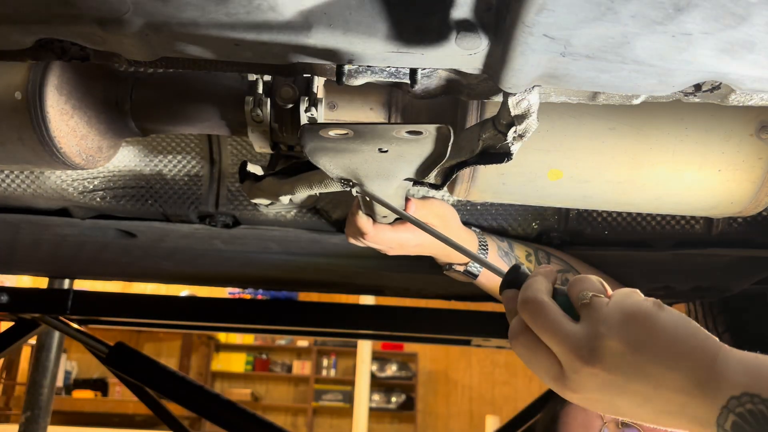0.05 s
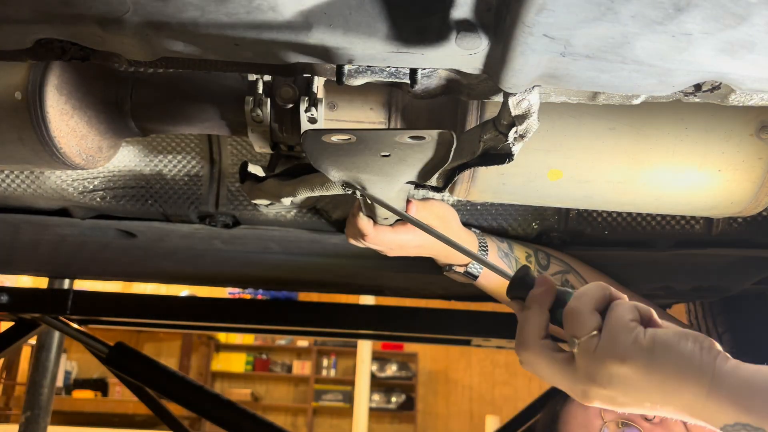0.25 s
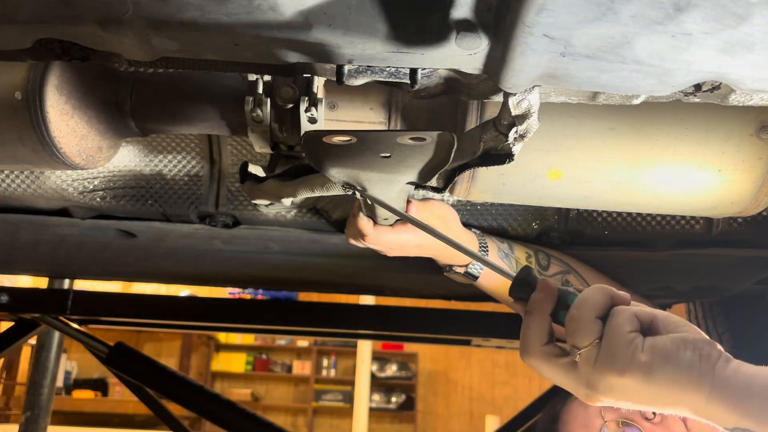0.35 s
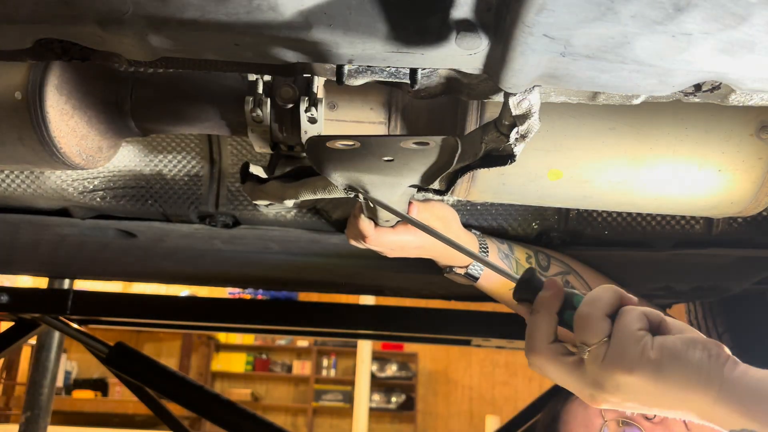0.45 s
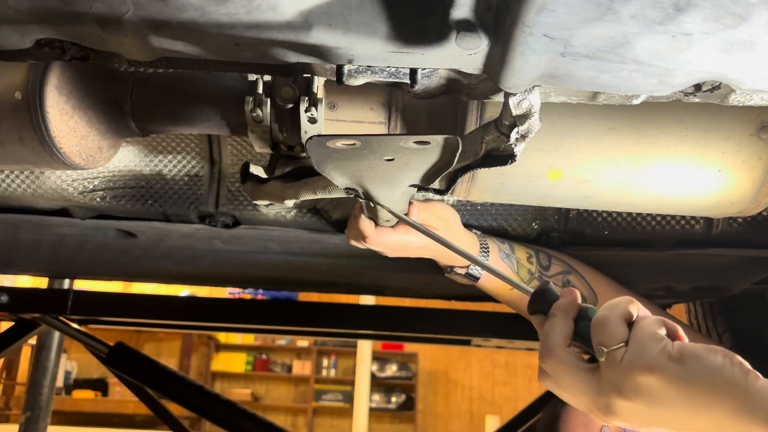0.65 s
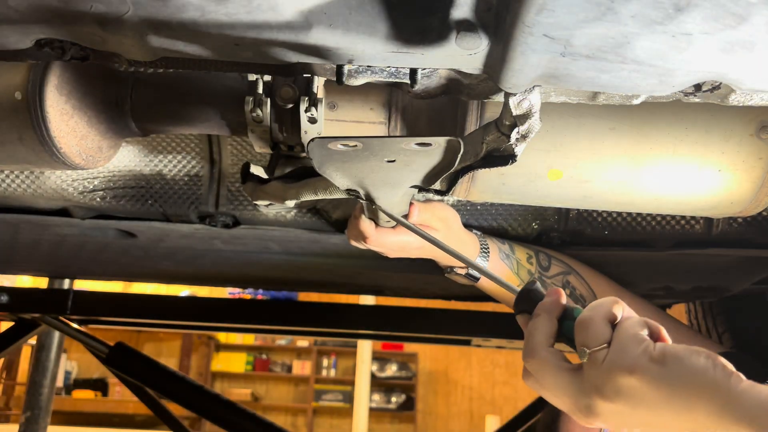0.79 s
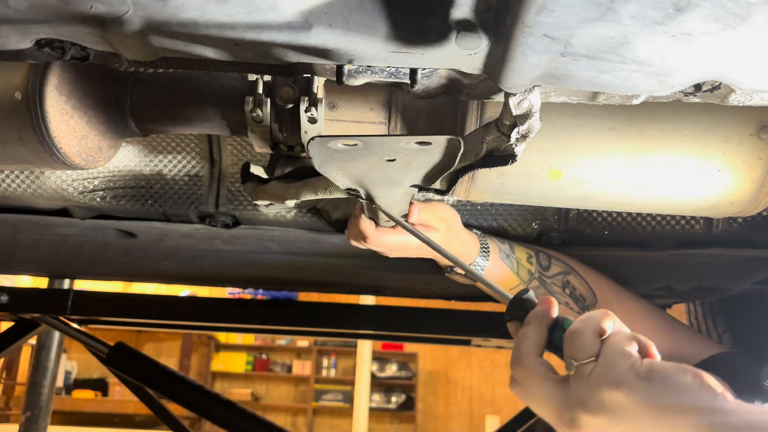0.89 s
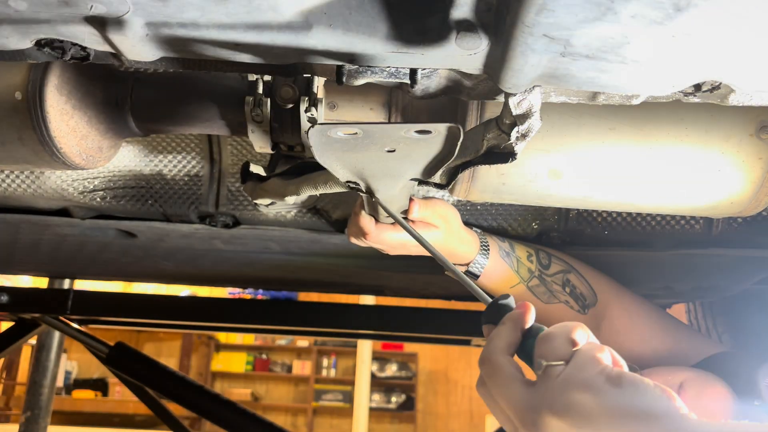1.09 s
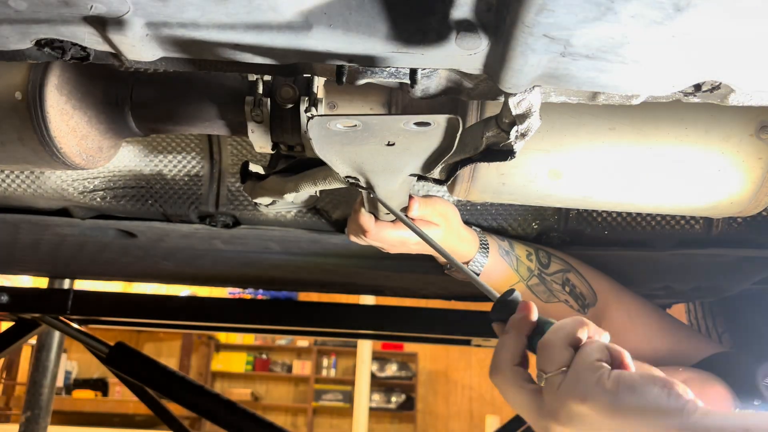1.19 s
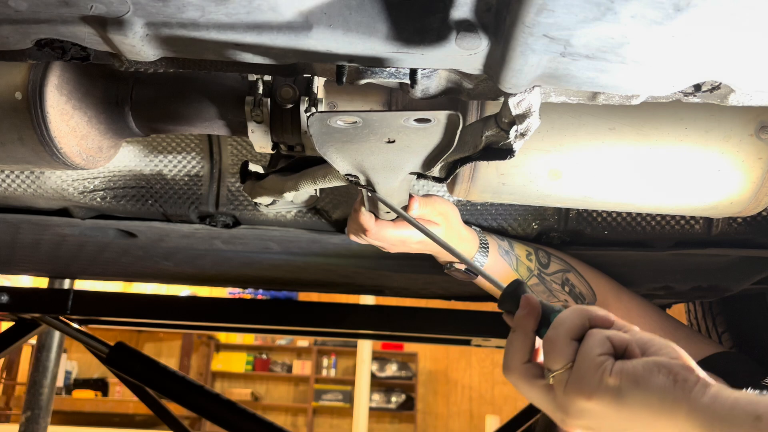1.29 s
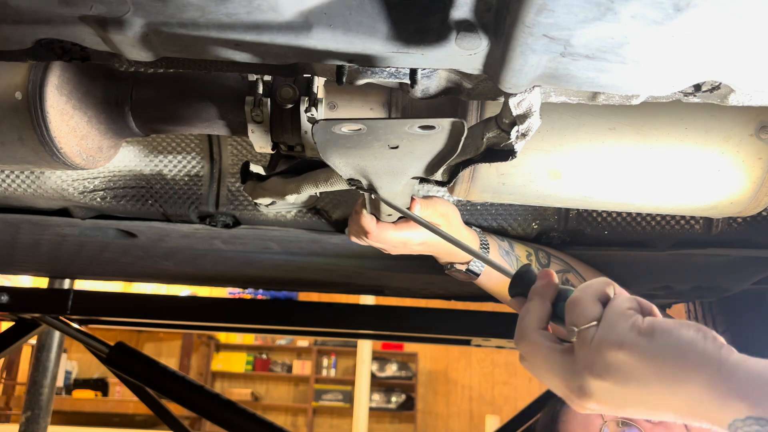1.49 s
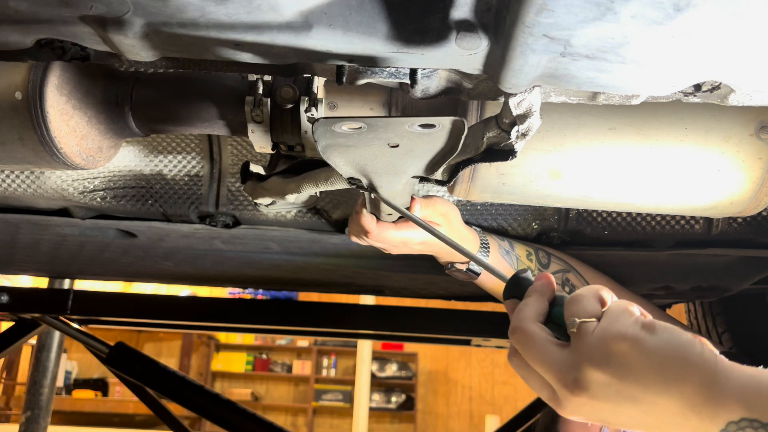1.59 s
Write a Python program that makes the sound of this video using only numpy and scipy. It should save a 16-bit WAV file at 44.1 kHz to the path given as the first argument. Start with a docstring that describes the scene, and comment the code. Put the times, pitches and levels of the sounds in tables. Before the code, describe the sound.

Screwdriver prying at a steel bracket: a sharp clip snap, a short scrape, light taps.

```python
"""A screwdriver pries plastic cable clips off a steel bracket under a car, in a garage.
One clip snaps free and rattles, setting the steel ringing. The blade bites and scrapes along the
bracket, its tiny slips driving the resonances, and later skids off an edge with a second click.
Around these, tool and hand knock softly on the underbody. Short reflections follow every
contact, over a faint bed of rumble, hum and hiss."""
import sys
import numpy as np
from scipy import signal
from scipy.fft import rfft, irfft, next_fast_len
from scipy.io import wavfile
from scipy.ndimage import map_coordinates

SR = 44100
rng = np.random.default_rng(int(sys.argv[2]) if len(sys.argv) > 2 else 0)


def unload_wav(signal):
    """Save mono or channel-first audio to the path in sys.argv[1] as 16-bit WAV at rate SR, clipped to [-1, 1]."""
    wavfile.write(
        sys.argv[1],
        SR,
        np.round(np.clip(np.atleast_2d(signal).T, -1, 1) * 32767).astype(np.int16),
    )


N = 72765
TIME = np.arange(N) / SR

SNAP_HITS = [(0.0725, -35.5, 0.0012), (0.0752, -16, 0.0009), (0.079, -30.5, 0.001), (0.089, -36.5, 0.0008),
             (.1043, -34.5, 0.0005), (0.1162, -34, 0.0004)]
# EQ of the plastic crack, the mounting's dull knock and the blade's skid (frequency [Hz], gain [dB])
CRACK_EQ = [(1500, -44), (3070, -32.5), (3630, -16.5), (5200, -6), (6570, -16), (11100, -6), (12100, -18),
            (13800, -7), (15500, -24)]
MOUNTING_EQ = [(200, -22), (480, -4), (800, -2.5), (1000, -6), (1300, 6.5), (1750, -13), (2700, -6.5),
               (4000, -25)]
SKID_EQ = [(250, -26), (700, -9), (1200, -7), (1750, -16.5), (2550, -20), (3400, -11), (4500, -12.5),
           (5370, -2.5), (6800, -9.5), (9700, 1.5), (12000, -8.5), (14600, -9), (17000, -12.5)]
# modes of bracket, heat shield, blade and underbody panel (frequency [Hz], gain [dB], t60 [s])
BRACKET_MODES = [(4540, -9, .08), (4785, -4, .1), (4970, -7, .08), (5220, -1, .09), (5395, 1, .1),
                 (5680, -7, .1), (11180, -10, .06), (11400, -10, .06)]
SHIELD_MODES = [(957, 0, .09), (1065, -9, .07), (1280, -6, .08)]
BLADE_MODES = [(5355, 0, .028), (5725, -14, .06), (9740, -13, .03)]
PANEL_MODES = [(264, -2, .22), (329, 1, .16), (377, -5, .17), (415, -9, .18), (495, -10, .18)]

# fader moves of the scrape, ahead of each band's trim (time [s], low [dB], mid [dB], high [dB])
SCRAPE_FADERS = [(0.528, -69, -87, -76), (0.537, -56, -82, -63), (0.552, -49, -61, -60),
                 (0.569, -46, -47.5, -50), (0.579, -53, -51, -39), (0.594, -50, -49, -40.5),
                 (0.622, -50.5, -44, -39), (0.642, -51, -47, -46), (0.685, -61.5, -75, -70),
                 (0.715, -56, -59.5, -63), (0.826, -59, -64, -88), (0.843, -57.5, -57, -86),
                 (0.869, -100, -107, -113)]
# EQ of the plain rubbing in each band (frequency [Hz], gain [dB])
LOW_RUB_EQ = [(150, -55), (255, -6), (340, -21.5), (520, -5.5), (640, -14), (900, -2), (1150, -18.5),
              (1500, -32.5)]
MID_RUB_EQ = [(700, -46), (1200, -0.5), (1550, 7), (1900, 2), (2300, -44), (4000, -26)]
HIGH_RUB_EQ = [(1180, -29), (2000, -1), (2500, -30), (2840, -20), (3100, 1), (4360, -8.5), (4590, 1.5),
               (8010, -11), (15500, -39)]
# resonances of the scraped steel and of the lightly dragged tip (frequency [Hz], width [Hz], gain [dB])
LOW_PEAKS = [(812, 25, -2), (905, 45, 0), (1010, 40, -7)]
MID_PEAKS = [(1320, 40, -9), (1484, 35, -2), (1610, 70, -5), (1740, 27, -4), (1905, 35, -5)]
HIGH_PEAKS = [(2780, 70, -8), (3760, 79, -9), (4250, 70, -1), (5390, 45, -7), (5730, 60, -9),
              (6940, 78, -10), (7950, 120, -7)]
SQUEAK_PEAKS = [(4370, 200, 0), (5650, 350, -10), (11700, 900, -17)]
# the blade bites into the steel (time [s], pitch [Hz], level [dB])
BITES = [(.546, 925, -41), (.568, 890, -46), (.592, 812, -43)]

# tool and hand contacts (time [s], level [dB], attack [s], t60 [s], edge gain [dB], hollow gain [dB])
KNOCK_HITS = [(.001, -59.5, 0.0013, 0.087, 0.5, -9.5), (0.25, -57.5, 0.0019, 0.16, -13, -5.5),
              (0.331, -54.5, 0.0012, 0.16, -22.5, -1), (0.842, -43, 0.0047, 0.064, -35, -2),
              (1.088, -62.5, 0.11, 0.9, -8, -1), (1.166, -50, 0.0036, 0.14, -11.5, -8),
              (1.193, -45.5, 0.0048, 0.06, -30, -4.5), (1.31, -49.5, 0.0065, 0.11, -2.5, 6.5),
              (1.498, -69, 0.0075, 0.2, -3, 1), (1.533, -55.5, 0.0051, 0.14, -11.5, 0.5),
              (1.588, -52.5, 0.0065, 0.092, -13.5, -14)]
# EQ of a knock's dull body and bright edge (frequency [Hz], gain [dB])
KNOCK_BODY_EQ = [(110, -43), (180, -13.5), (382, -3), (500, -4.5), (610, -5.5), (760, -1), (872, -5),
                 (992, -2), (1410, -8), (2030, -22), (2480, -50), (6600, -47)]
KNOCK_EDGE_EQ = [(1000, -25), (2500, -5), (4000, -7), (5400, 2.5), (6500, -6.5), (10000, -11),
                 (15000, -16.5)]
# dry plastic ticks (time [s], level [dB], t60 [s], centre [Hz], width [octaves])
PLASTIC_TICKS = [(.2505, -56.5, 0.098, 3090, 0.35), (1.423, -61, 0.032, 8600, 1)]

# reverb decay of the garage (frequency [Hz], t60 [s])
GARAGE_DECAY = [(200, 0.48), (1200, 0.13), (5000, 0.11), (14000, 0.12)]
# EQ of the room's hiss and rumble (frequency [Hz], gain [dB])
HISS_EQ = [(71, -33.5), (120, -5.5), (519, -20.5), (955, -20), (2590, -36.5), (3510, -34.5), (5270, -34),
           (6600, -37.5), (10500, -37), (14000, -40), (15500, -47)]
RUMBLE_EQ = [(8, -9), (20, 1), (35, -4.5), (55, -16), (110, -18), (180, -37), (400, -66.5)]

SHARP_ATTACK_S, RING_ATTACK_S = .0008, .002
BUZZ_PER_S, BUZZ_RAD, BUZZ_FULL_HZ = 110, .5, 1500  # loose parts blur every ring, low modes less


def clip_snaps():
    rattle = np.zeros(N)
    for start, db, attack in SNAP_HITS:
        crack = noise(CRACK_EQ) * strike(start, attack, t60=.03)
        ping = ring([(5200, 2, .018)], start + .0026, attack)  # the plastic's own short note
        bracket = amp(-19.5) * ring(BRACKET_MODES, start, attack)
        shimmer = noise_burst(start, db=-38, t60=.3, centre_hz=5200, octaves=.16)  # dense steel ring
        mounting = amp(-22.5) * noise(MOUNTING_EQ) * strike(start, attack=.004, t60=.1)
        shield = amp(-25) * ring(SHIELD_MODES, start, RING_ATTACK_S)
        rattle += amp(db) * (crack + ping + bracket + shimmer + mounting + shield)
    return rattle


def blade_slip(start=1.2899, end=1.301, creep_db_per_s=2000):
    """The tip creeps ever louder, then skids over an edge; the blade rings until the hand damps it."""
    def skid(t60):
        return (1 - np.exp(-since(start) / SHARP_ATTACK_S)) * decay(since(end), t60)

    creep = (TIME < start) * amp(-4 - creep_db_per_s * np.abs(start - TIME))
    friction = noise(SKID_EQ) * (creep + skid(t60=.03))
    blade = sum(amp(db) * skid(t60) * tone(hz, BUZZ_RAD) for hz, db, t60 in BLADE_MODES)
    shield = ring(SHIELD_MODES, start, RING_ATTACK_S)
    return amp(-35) * (friction + amp(2) * blade + amp(-2) * shield)


def blade_scrape():
    """The blade bites and drags hard: friction grains ring the steel and the bracket squeals."""
    times, *faders = np.transpose(SCRAPE_FADERS)
    low, mid, high = (amp(np.interp(TIME, times, db, left=-120, right=-120)) for db in faders)
    drag = (low * friction_band(LOW_RUB_EQ, LOW_PEAKS, rub_db=-7.5, ring_db=-2.5)
            + mid * friction_band(MID_RUB_EQ, MID_PEAKS, rub_db=-9.5, ring_db=-4.5)
            + high * friction_band(HIGH_RUB_EQ, HIGH_PEAKS, rub_db=-11, ring_db=-7.5))
    bites = sum(ring([(hz, db, .11)], start, RING_ATTACK_S) for start, hz, db in BITES)
    squeal = mid * tone(hz=1721, blur_rad=BUZZ_RAD)
    return drag + bites + squeal


def friction_band(eq, peaks, rub_db, ring_db):
    """One band of the scrape: gritty rubbing with the steel's ring standing over it."""
    return amp(rub_db) * equalised(grains(), eq) + amp(ring_db) * resonate(grains(), peaks)


def grains(per_s=1800, spread_db=2):
    """Friction as tiny slips, random in time, size and sign."""
    slips = rng.random(N) < per_s / SR
    return slips * amp(spread_db * rng.standard_normal(N)) * rng.choice([-1, 1], N)


def tip_squeak(start=.70, end=.85, fade_s=.035):
    """The lightly dragged tip ends the scrape on a thin squeak."""
    fade = np.clip(np.minimum(TIME - start, end - TIME) / fade_s, 0, 1)
    return amp(-68) * fade * resonate(grains(), SQUEAK_PEAKS)


def underbody_knocks():
    """Soft knocks of tool and hand, dry plastic ticks and one thump of the sheet panel."""
    knocks = np.zeros(N)
    for start, db, attack, t60, edge_db, hollow_db in KNOCK_HITS:
        contact = noise(KNOCK_BODY_EQ) + amp(edge_db) * noise(KNOCK_EDGE_EQ)
        hollow = ring([(513, hollow_db, .11)], start, attack)  # the heat shield's lowest mode
        knocks += amp(db) * (contact * strike(start, attack, t60) + hollow)
    ticks = sum(noise_burst(*tick) for tick in PLASTIC_TICKS)
    thump = amp(-42) * ring(PANEL_MODES, start=.337, attack=.011)
    return knocks + ticks + thump


def garage_reverb(x, predelay_s=.0037):
    """Reflections from underbody and walls; the treble dies first."""
    hz, t, spectrum = signal.stft(rng.standard_normal(SR // 2), SR, nperseg=256)
    spectrum *= decay(t, curve_at(GARAGE_DECAY, hz)[:, None])
    _, tail = signal.istft(spectrum, SR, nperseg=256)
    delayed = np.pad(x, (int(predelay_s * SR), 0))
    return signal.fftconvolve(delayed, tail / np.linalg.norm(tail))[:N]


def room_tone(hum_hz=87, hum_width_hz=12, swells_per_s=8):
    """The bed: faint hiss, a gently swelling rumble and a wavering low hum."""
    swell_db = 1.5 * map_coordinates(rng.standard_normal(N), [TIME * swells_per_s])
    hum = filtered(rng.standard_normal(N), lambda hz: 1 / (1 + ((hz - hum_hz) / hum_width_hz) ** 2))
    hiss = amp(-73.5) * noise(HISS_EQ)
    rumble = amp(-63 + swell_db) * noise(RUMBLE_EQ)
    return hiss + rumble + amp(-70) * unit_rms(hum)


def ring(modes, start, attack):
    """Struck (frequency [Hz], gain [dB], t60 [s]) modes, balanced a little differently at each blow."""
    return sum(amp(db + rng.normal(0, 1)) * strike(start, attack, t60)
               * tone(hz, BUZZ_RAD * min(hz / BUZZ_FULL_HZ, 1)) for hz, db, t60 in modes)


def tone(hz, blur_rad):
    """A sine roughened by a wandering phase."""
    offsets = rng.standard_normal(int(N * BUZZ_PER_S / SR) + 4)
    wander = map_coordinates(offsets, [TIME * BUZZ_PER_S], order=1)
    return np.sin(2 * np.pi * (hz * TIME + rng.random()) + blur_rad * wander)


def noise_burst(start, db, t60, centre_hz, octaves):
    """A sharp, dying burst of noise in one bell-shaped band."""
    band = filtered(rng.standard_normal(N),
                    lambda hz: np.exp(-.5 * (np.log2((hz + 1) / centre_hz) / octaves) ** 2))
    return amp(db) * unit_rms(band) * strike(start, SHARP_ATTACK_S, t60)


def resonate(x, peaks):
    """x through parallel resonators, at rms 1."""
    def response(hz):
        return sum(amp(db) * 1j * hz * width / (centre ** 2 - hz ** 2 + 1j * hz * width)
                   for centre, width, db in peaks)
    return unit_rms(filtered(x, response))


def strike(start, attack, t60):
    """Envelope of a contact: quick attack, exponential decay."""
    t = since(start)
    return (1 - np.exp(-t / attack)) * decay(t, t60)


def decay(t, t60):
    return np.exp(-np.log(1000) * t / t60)


def since(start):
    return np.maximum(TIME - start, 0)


def noise(eq):
    return equalised(rng.standard_normal(N), eq)


def equalised(x, eq):
    """x through an EQ curve, at rms 1."""
    return unit_rms(filtered(x, lambda hz: amp(curve_at(eq, hz))))


def filtered(x, response):
    """x with its spectrum multiplied by response(hz)."""
    size = next_fast_len(N + SR // 2)
    return irfft(rfft(x, size) * response(np.fft.rfftfreq(size, 1 / SR)), size)[:N]


def curve_at(points, hz):
    """Breakpoints joined on a log frequency axis."""
    frequencies, values = np.transpose(points)
    return np.interp(np.log(hz + 1), np.log(frequencies + 1), values)


def unit_rms(x):
    return x / np.sqrt(np.mean(x ** 2) + 1e-20)


def amp(db):
    return 10 ** (np.asarray(db) / 20)


def scene():
    """Mono mix: the screwdriver work and its reverb over the room tone."""
    work = clip_snaps() + blade_slip() + underbody_knocks() + blade_scrape() + tip_squeak()
    return (work + amp(-10) * garage_reverb(work) + room_tone())[None]


def record(dry):
    """A steep high cut takes off the very top."""
    cutoff_hz = 15800
    return filtered(dry[0], lambda hz: 1 / (1 + (hz / cutoff_hz) ** 120))[None]


dry = scene()
out = record(dry)
unload_wav(out)
```